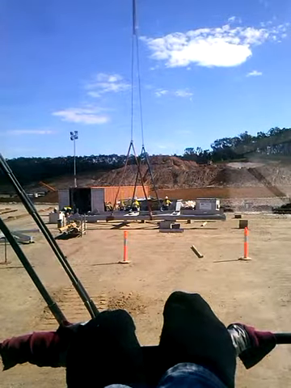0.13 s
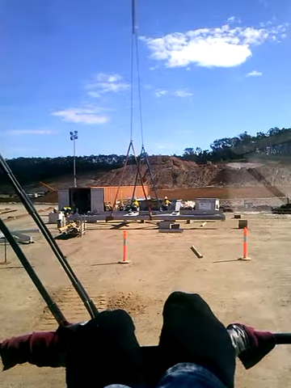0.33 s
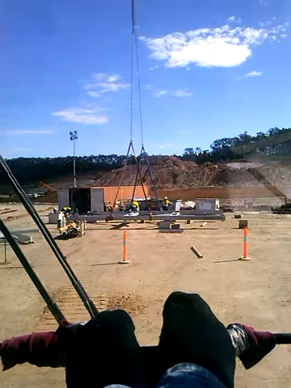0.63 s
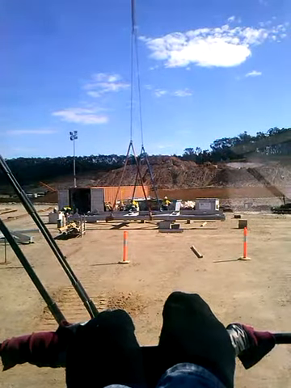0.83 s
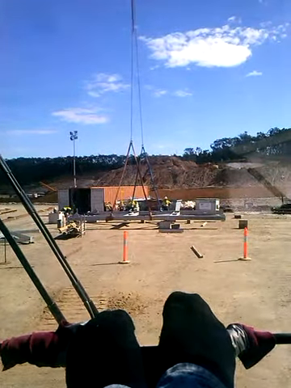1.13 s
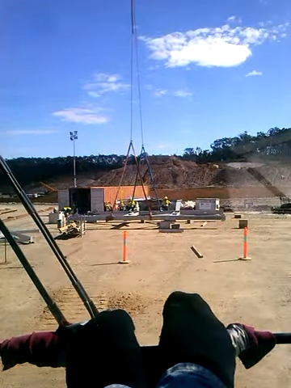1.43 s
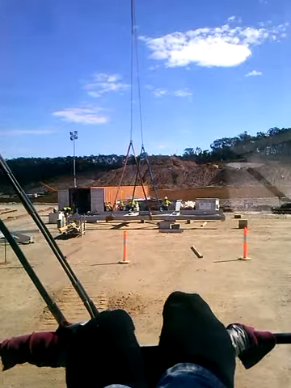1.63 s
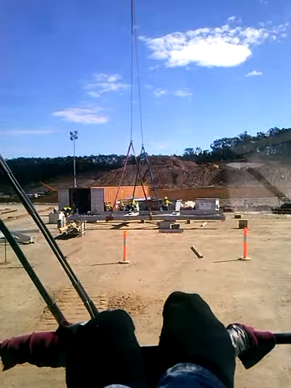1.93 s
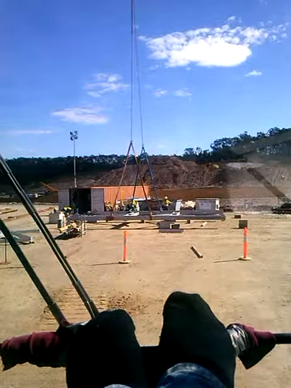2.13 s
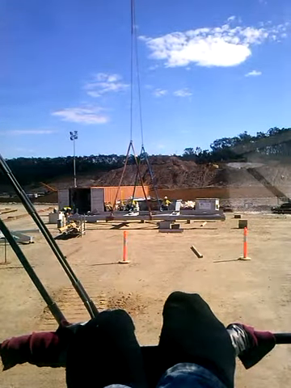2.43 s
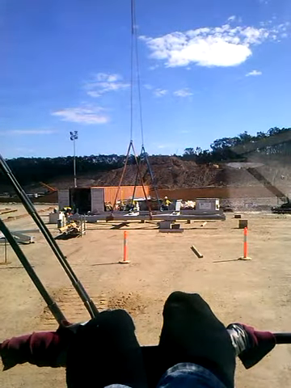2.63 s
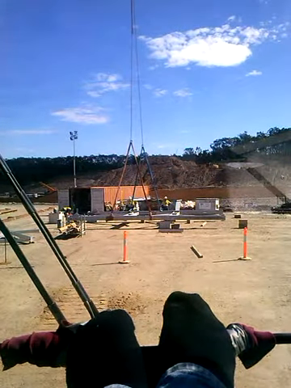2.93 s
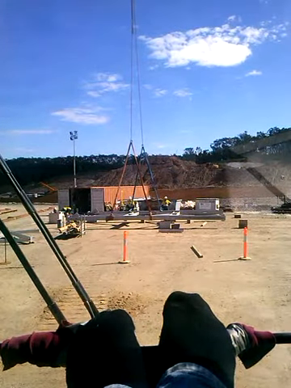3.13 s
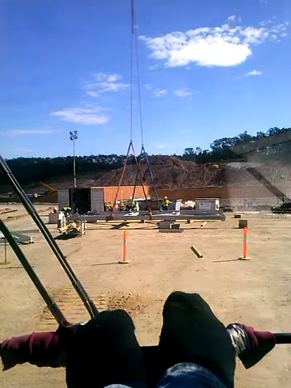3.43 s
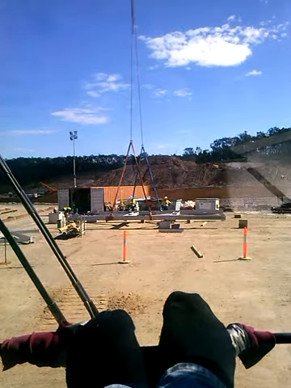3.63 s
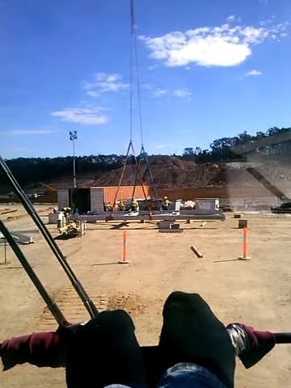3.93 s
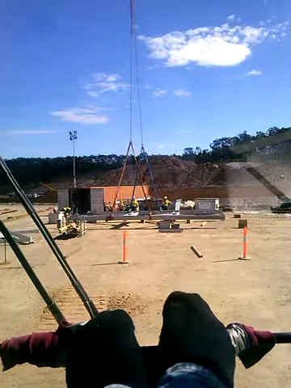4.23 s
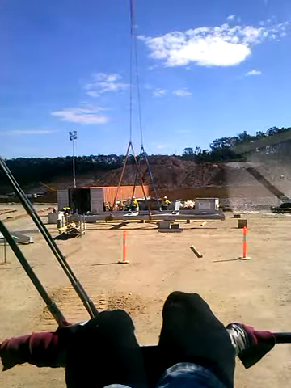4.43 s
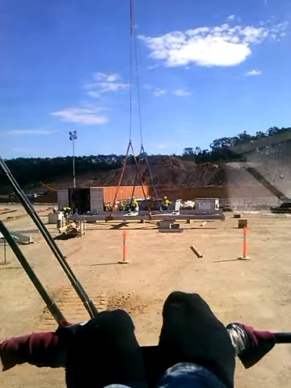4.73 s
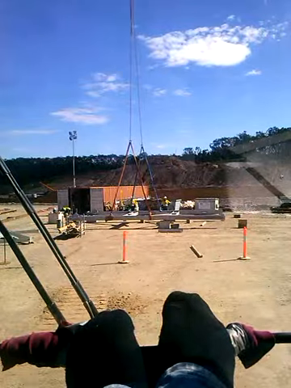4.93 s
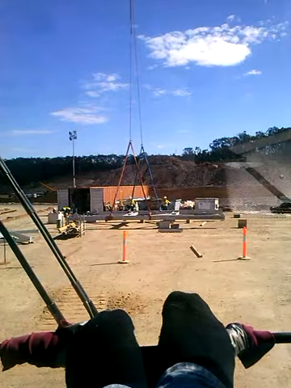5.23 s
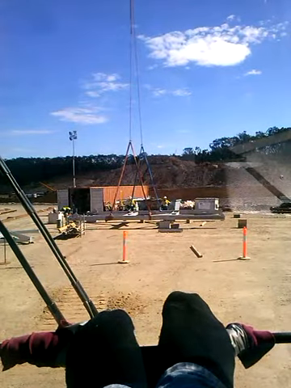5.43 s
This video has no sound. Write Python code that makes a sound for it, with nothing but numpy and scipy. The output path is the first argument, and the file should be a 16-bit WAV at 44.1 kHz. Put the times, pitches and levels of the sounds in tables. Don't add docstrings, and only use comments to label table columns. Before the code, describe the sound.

A continuous mono bed of low engine drone, mid-low hydraulic hum, gear whine and dull air roar fills a resonant cab on a construction site. Close to the microphone, soft taps and a console shudder lead into a latch clack, then a bright double snap. After the pump takes load, its hum swells; later a loose metal fitting chatters several times, ending with a lever click.

```python
import sys
import numpy as np
from scipy import signal
from scipy.io import wavfile
from scipy.ndimage import uniform_filter1d

SR = 44100
rng = np.random.default_rng(int(sys.argv[2]) if len(sys.argv) > 2 else 0)


def boost(x):
    u = np.asarray(x, float) / 20
    return 10 ** u


def store_pcm(level_fs):
    pcm = np.round(np.clip(level_fs, -1, 1) * 32767).astype(np.int16)
    wavfile.write(sys.argv[1], SR, np.atleast_2d(pcm).T)


N = 246519


def evened(x):
    return x / np.sqrt(np.mean(x ** 2) + 1e-20)


def read(points, hz):
    f, value = np.transpose(points)
    return np.interp(np.log(hz + 1), np.log(f + 1), value)


def follow(rows):
    s, *columns = np.transpose(rows)
    return [np.interp(np.arange(N) / SR, s, c) for c in columns]


def add(mix, start_s, sound):
    part = mix[round(start_s * SR):][:len(sound)]
    part += sound[:len(part)]


def drift(top_hz):
    t = np.arange(0, N + 256, 256) / SR
    slow = sum(np.sin(2 * np.pi * (f * t + rng.random())) for f in np.geomspace(top_hz / 20, top_hz, 20))
    return np.interp(np.arange(N) / SR, t, evened(slow))


def tone(hz, level_db):
    cycles = np.cumsum(hz * np.ones(N)) / SR
    return np.sqrt(2) * boost(level_db) * np.sin(2 * np.pi * (cycles + rng.random()))


def ring(x, modes):
    out = np.zeros(len(x))
    for hz, width_hz, level_db in modes:
        r = np.exp(-np.pi * width_hz / SR)
        poles = [1, -2 * r * np.cos(2 * np.pi * hz / SR), r * r]
        out += boost(level_db) * (1 - r) * signal.lfilter([1, 0, -1], poles, x)
    return out


def roar():
    # freq_hz, density_db
    roar_shape = [(8, -35), (25, -4.5), (60, -11.5), (140, -9.5), (285, -10.5), (450, -11), (900, -16.5),
                  (1200, -18.5), (1900, -24.5), (3000, -34.5), (5000, -39), (9500, -39.5), (11500, -47),
                  (16000, -50)]
    # freq_hz, width_hz, boost_db
    panels = [(92, 51.6, 10), (215.7, 21.6, 9), (287, 22, -5.5), (350, 120, 2), (425, 42, 2),
              (513.7, 13, 7), (612, 26, 3), (707, 61, 4), (862, 95, 5.5), (1071, 112, 6.5), (1410, 38, 3),
              (1940, 63, 3), (2920, 78, 0), (3770, 990, 2.5)]
    roar_db, lumps_hz = -34, 7.0
    boom_lump_db, deep_lump_db = 2.2, 4.0
    frames, hz = N // 1024 + 6, np.fft.rfftfreq(4096, 1 / SR)
    a, b, patches = rng.standard_normal((frames, len(hz), 3)).T
    patches = evened(uniform_filter1d(uniform_filter1d(patches, 20, 0), 5, 1))
    boom_db = sum(db * np.exp(-2 * ((hz - f) / width) ** 2) for f, width, db in panels)
    lumps_db = 0
    for centre_hz, reach_hz, swing_db in ((195, 70, boom_lump_db), (55, 50, deep_lump_db)):
        reach = np.exp(-((hz - centre_hz) / reach_hz) ** 2)
        swing = np.resize(drift(lumps_hz)[::1024], frames)
        lumps_db = lumps_db + np.outer(reach, swing_db * swing)
    colour_db = (read(roar_shape, hz) + boom_db)[:, None]
    z = (a + 1j * b) * boost(colour_db + 0.6 * patches + lumps_db)
    return boost(roar_db) * evened(signal.istft(z, nperseg=4096, noverlap=3072)[1][:N])


def fan():
    line_hz = [33.6, 108.8, 192.5, 206.85, 217.5, 325, 413.7, 620.57, 713, 1051]
    # level_db, waver_hz
    line_rows = [(-44.5, 1.5), (-43, 0.76), (-50, 0.98), (-55.5, 0.076), (-47.5, 2.51), (-55, 2.7),
                 (-57.5, 0.044), (-46, 0.085), (-54.5, 0.29), (-53.5, 0.83)]
    return sum(tone(hz + waver_hz * drift(3.0), level_db + 1.1 * drift(5.0))
               for hz, (level_db, waver_hz) in zip(line_hz, line_rows))


def whine():
    # time_s, pitch_hz
    mesh_curve = [(0.0, 963.5), (0.25, 961.5), (0.6, 958.3), (1.1, 959), (1.6, 960.6), (2.25, 965),
                  (2.95, 965.6), (3.35, 958.5), (3.7, 959), (4.15, 961.5), (4.5, 959.5), (4.8, 961.5),
                  (5.15, 958), (5.59, 955.5)]
    whine_db, flutter_db = -39.5, 0.9
    hz, = follow(mesh_curve)
    return tone(hz + 0.41 * drift(8.0), whine_db + flutter_db * drift(15.0))


def chatter(rows, modes):
    t, out = np.arange(10000) / SR, np.zeros(N)
    for start_s, level_db, length_s, t60_s in rows:
        buzz = ring(ring(rng.standard_normal(len(t)), modes), modes)
        buzz /= buzz[200:1200].std()
        part_fall = boost(-60 * np.maximum(t - length_s, 0) / t60_s)
        cab_fall = boost(-13.0 - 60 * t / 0.5)
        rise = np.minimum(t / 0.0037, 1)
        add(out, start_s, boost(level_db) * (part_fall + cab_fall) * rise * buzz)
    return out


def loose_fitting():
    # start_s, level_db, length_s, t60_s
    rattle_rows = [
        (0.884, -49.5, 0.023, 0.14),
        (3.6, -56, 0.056, 0.16),
        (4.273, -46.5, 0.018, 0.12),
        (4.887, -48.5, 0.011, 0.17),
        (5.33, -55, 0.018, .1),
        (5.54, -44.5, 0.017, 0.12),
    ]
    # freq_hz, width_hz, level_db
    fitting_modes = [(2690, 90, 6), (2850, 110, 1)]
    return chatter(rattle_rows, fitting_modes)


def console():
    # start_s, level_db, length_s, t60_s
    shudder_rows = [(.06, -37.5, 0.092, 0.15)]
    # freq_hz, width_hz, level_db
    console_modes = [(417, 50, 4), (595, 60, -1), (669, 53, 2.5), (800, 32, -1)]
    return chatter(shudder_rows, console_modes)


def clicks(rows, body, rise_s, hold, edge):
    # freq_hz, level_db
    snap_shape = [(1000, -23.5), (4000, -17.5), (6000, -11.5), (7400, -7), (8700, 0.5), (9700, -2),
                  (10800, -11.5), (13000, -22), (14500, -27), (15800, -50)]
    t, out = np.arange(8000) / SR, np.zeros(N)
    log_gain = np.log(boost(read(snap_shape, abs(np.fft.fftfreq(1024, 1 / SR)))))
    colour = np.fft.ifft(np.exp(np.conj(signal.hilbert(log_gain)))).real[:512]
    for start_s, snap_db, knock_db, t60_s in rows:
        tick_db = 4.2 * np.minimum(rng.exponential(1, len(t)), 4)
        ticks = rng.standard_normal(len(t)) * boost(tick_db) * np.minimum(t / rise_s, 1)
        ticks[round(rise_s * SR)] = 5.5
        dying = ticks * boost(-60 * np.maximum(t - hold * t60_s, 0) / t60_s)
        snap = signal.fftconvolve(dying, colour)[:len(t)]
        snap += edge * ring(dying, 2 * [(11300, 1200, -13.5)])
        knock = ring(uniform_filter1d(ticks, size=5) * boost(-60 * t / (1.1 * t60_s)), body)
        add(out, start_s, boost(snap_db) * snap / snap[:300].std() + boost(knock_db) * knock / knock[:300].std())
    return out


def levers():
    # start_s, snap_db, knock_db, t60_s
    latch_rows = [
        (.2249, -36, -27.5, 0.0075),
        (.228, -34, -34.5, 0.057),
        (.232, -36, -39, 0.12),
        (.247, -47, -37.5, 0.054),
    ]
    # start_s, snap_db, knock_db, t60_s
    detent_rows = [
        (.893, -54, -64, 0.021),
        (1.477, -41, -45, 0.07),
        (1.4836, -27.5, -49, 0.035),
        (1.4872, -23.5, -38, 0.034),
        (1.4925, -30, -54, 0.08),
        (4.852, -43, -62, 0.0032),
        (5.568, -33, -45, 0.12),
    ]
    # start_s, snap_db, knock_db, t60_s
    tap_rows = [
        (.027, -55.5, -40.5, 0.056),
        (.041, -53, -48, 0.046),
        (.086, -55, -39.5, 0.055),
        (.1, -56, -48, 0.045),
        (.111, -57, -51, .04),
    ]
    # freq_hz, width_hz, level_db
    lever_body = [(860, 150, 4), (1385, 95, 11.5), (1920, 210, 5.5), (2200, 190, -0.5), (2860, 320, -4),
                  (3500, 780, -7), (3970, 750, -9)]
    # freq_hz, width_hz, level_db
    tapped_body = [(1410, 140, -13), (2170, 270, 10), (3200, 520, -6), (3960, 450, -15)]
    latch = clicks(latch_rows, lever_body, 0.00033, hold=0.063, edge=1.9)
    detents = clicks(detent_rows, lever_body, 0.00016, hold=0.054, edge=0.2)
    taps = clicks(tap_rows, tapped_body, 0.0026, hold=0.11, edge=0.1)
    return latch + detents + taps


def pump():
    # time_s, pitch_hz
    hum_curve = [(0.0, 347.4), (0.5, 348.1), (1.0, 347.7), (1.85, 347.0), (2.05, 343.5), (2.35, 346.9),
                 (5.59, 347.0)]
    # time_s, level_db
    effort_curve = [(0.0, -30.5), (0.35, -33.5), (0.55, -37), (1.0, -35.5), (1.5, -36), (1.85, -33),
                    (2.1, -30), (3.2, -30.5), (5.59, -31.5)]
    beat_hz, beat_top_s, beat_db = 3.497, 0.12, -42
    load_s, fifth_db, fifth_dip_db = 1.85, -42.5, -15
    fifth_back_s, fifth_rise_s = 1.3, 0.3
    octave_db, octave_share = -47.5, 1.6
    hz, db = follow(hum_curve) + follow(effort_curve)
    t = np.arange(N) / SR
    beat = boost(beat_db - db) * np.exp(2j * np.pi * beat_hz * (t - beat_top_s))
    carrier = np.exp(2j * np.pi * np.cumsum(hz) / SR)
    hum = np.sqrt(2) * boost(db + 0.27 * drift(12.0)) * ((1 + beat) * carrier).real
    since_s = np.maximum(t - load_s, 0)
    dip = (1 - np.exp(-since_s / 0.06)) * np.exp(-(since_s / fifth_back_s) ** 2)
    dip += 0.55 * np.exp(-t / fifth_rise_s)
    fifth = tone(hz * 3 / 2 + 0.4 * drift(6.0), fifth_db + fifth_dip_db * dip + 0.55 * drift(4.0))
    octave_level_db = octave_db + octave_share * (db - db.max()) + 1.8 * drift(4.1)
    octave = tone(hz * 2 + 0.88 * drift(6.0), octave_level_db)
    return hum + fifth + octave


def engine():
    order_numbers = [1, 2, 3, 4, 6, 25, 26, 30, 42]
    order_levels = [-61, -49.5, -55.5, -33, -50.5, -55.5, -57, -58, -65.5]
    crank_hz = 28.893
    speed_hz = crank_hz * (1 + 0.00041 * drift(1.69))
    return sum(tone(k * speed_hz, level_db + 0.25 * drift(1.2))
               for k, level_db in zip(order_numbers, order_levels))


def scene():
    machinery = engine() + pump() + whine() + fan() + roar()
    return (machinery + levers() + loose_fitting() + console())[None]


def gate_weak_bands(x):
    # freq_hz, margin_db
    margin_curve = [(4000, -7), (4800, -2.7), (5400, -3.2), (5900, -2.6), (7500, -2.8), (9300, -3.5),
                    (10100, -1.6), (10900, .9), (11600, 2.1), (12400, 3.2), (15000, 4.2)]
    band_bins = [160, 176, 196, 216, 240, 264, 292, *range(320, 705, 32), 942]
    hop, lead = 941, 676
    hz, t, z = signal.stft(np.pad(x, (lead, hop)), SR, "cosine", 2 * hop, hop)
    sway_db = 0.5 * rng.standard_normal(len(t))
    for lo, hi in zip(band_bins, band_bins[1:]):
        level_db = 10 * np.log10((abs(z[lo:hi]) ** 2).mean(0) + 1e-20)
        margin_db = read(margin_curve, hz[(lo + hi) // 2]) + sway_db
        z[lo:hi] *= level_db > np.median(level_db) + margin_db
    return signal.istft(z, SR, "cosine", 2 * hop, hop)[1][lead:lead + N]


def top_cut(x):
    return signal.sosfilt(signal.butter(12, 15730, fs=SR, output="sos"), x)


def record(dry):
    mix = gate_weak_bands(dry[0])[None] + 0.0011
    return top_cut(mix)


dry = scene()
out = record(dry)
store_pcm(out)
```